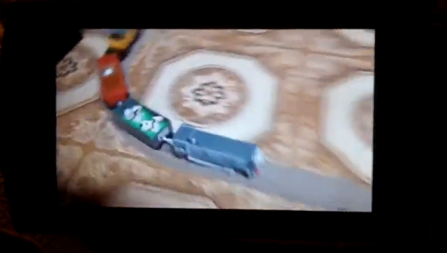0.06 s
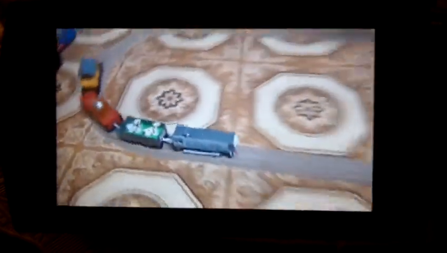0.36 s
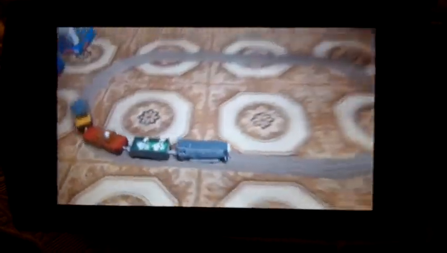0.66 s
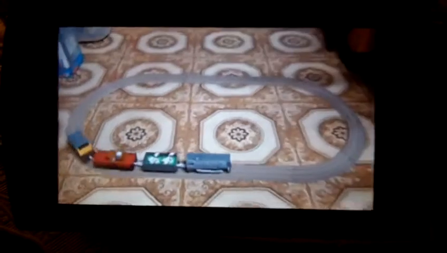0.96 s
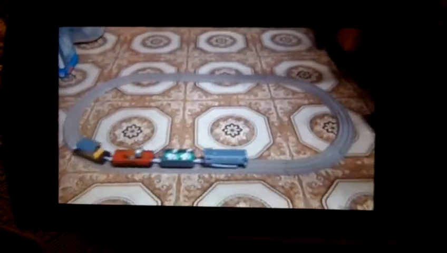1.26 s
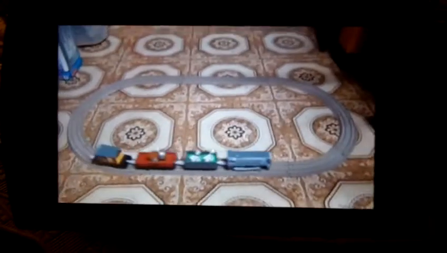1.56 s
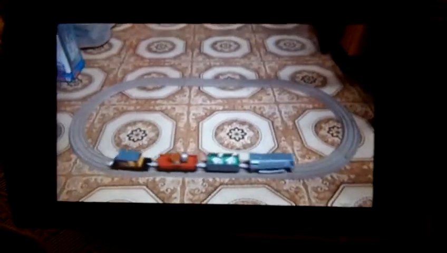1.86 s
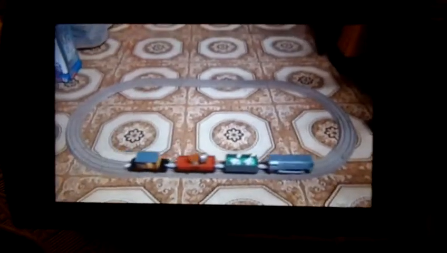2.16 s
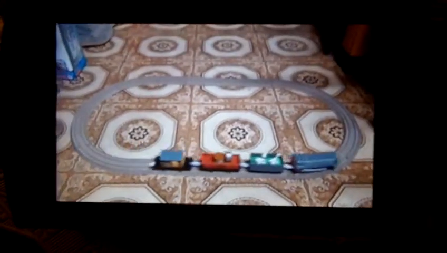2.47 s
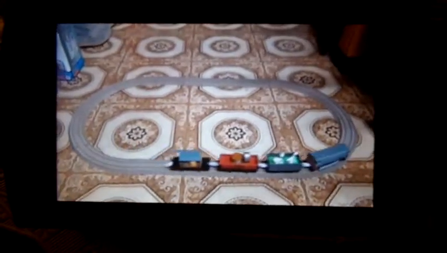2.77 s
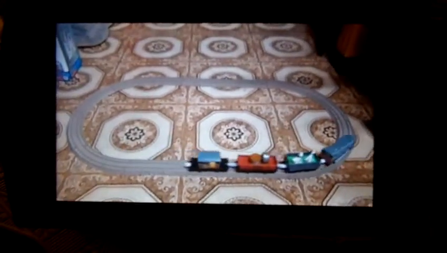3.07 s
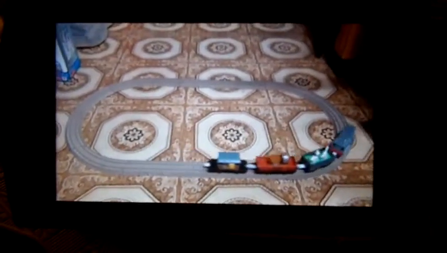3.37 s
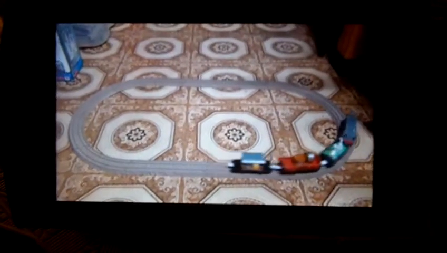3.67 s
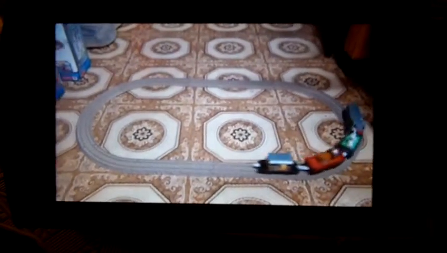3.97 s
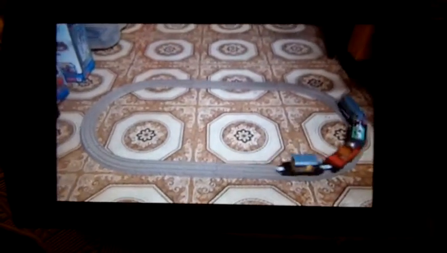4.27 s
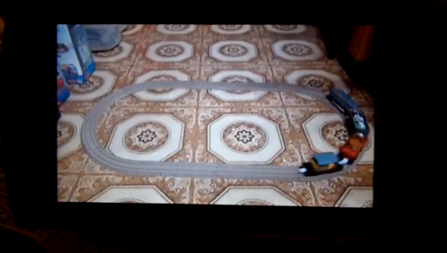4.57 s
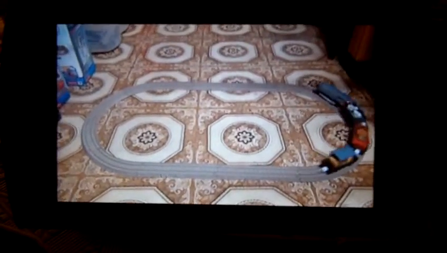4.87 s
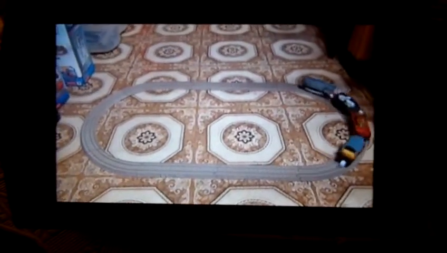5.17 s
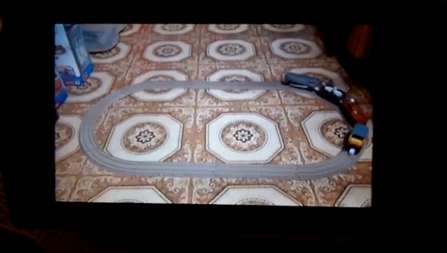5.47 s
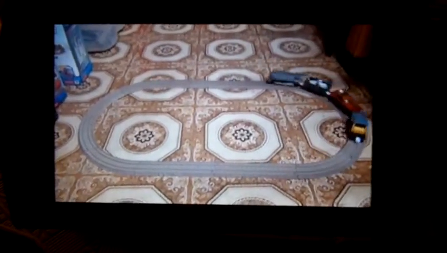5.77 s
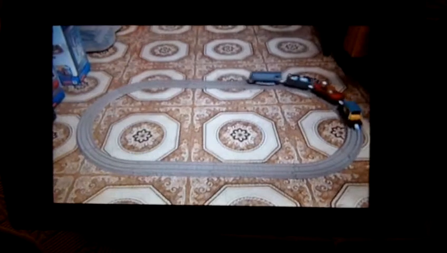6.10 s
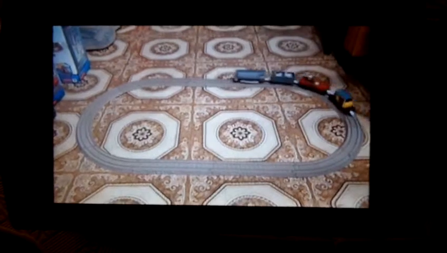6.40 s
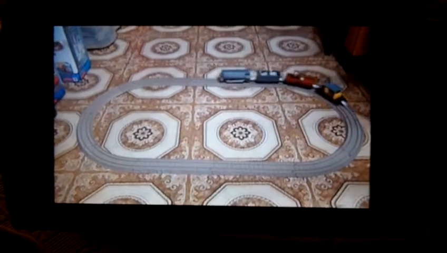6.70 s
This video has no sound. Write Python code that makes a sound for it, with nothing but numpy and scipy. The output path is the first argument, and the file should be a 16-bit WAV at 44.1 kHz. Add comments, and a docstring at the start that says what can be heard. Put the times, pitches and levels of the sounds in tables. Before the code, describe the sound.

Thin motor whir, chattering plastic gears and clicking wagons as a toy train circles its hollow track indoors, close by and then slightly farther away.

```python
"""A battery toy train circles a plastic track on a tiled floor, close by, then off round the far bend.
Its motor ticks once a turn, and loose gear teeth chatter, snap and whine in the plastic shell.
The wheels drum on the hollow track and squeak in the bends; the wagons clack along behind.
The room is small, with a low rumble, and the microphone takes one soft cluster of bumps.
The sound is thin and nearly mono, with narrow notches in the treble."""
import sys
import numpy as np
from scipy import signal
from scipy.fft import rfft, irfft
from scipy.io import wavfile
from scipy.ndimage import uniform_filter1d

SR = 44100
rng = np.random.default_rng(int(sys.argv[2]) if len(sys.argv) > 2 else 0)


def bounce(signal):
    """Save signal as a 16-bit WAV file at the path given by the first command-line argument."""
    frames = np.transpose(np.atleast_2d(signal))
    limited = np.clip(frames, -1, 1)
    pcm = np.round(limited * 32767).astype(np.int16)
    wavfile.write(sys.argv[1], SR, pcm)


N = 297234
T = np.arange(N) / SR

# room rumble common to both channels: freq_hz, level_db
RUMBLE_SPECTRUM = [(3, -2), (18, 1), (30, -6.5), (45, -9.5), (62, -11.5), (80, -15), (120, -20), (200, -23),
                   (450, -27.5), (1000, -55.5), (4000, -59)]
# room rumble that differs between left and right: freq_hz, level_db
RUMBLE_SIDE_SPECTRUM = [(3, 0), (30, -3), (50, -6), (90, -13), (170, -35), (550, -35), (900, -58)]
# a brief low rush in the background: freq_hz, level_db
RUSH_SPECTRUM = [(250, -18), (385, -1), (520, -10)]
# soft bumps right on the microphone: start_s, level_db, pitch_hz, decay_s
MIC_BUMPS = [(1.751, -43, 320, 0.0028), (1.769, -31.5, 556, 0.002), (1.788, -47, 400, 0.0023),
             (1.8, -47, 80, 0.01), (1.804, -41, 296, 0.0025), (1.809, -37, 28.2, 0.012),
             (1.829, -44, 590, 0.0052)]
# narrow dips in the recorder's response: freq_hz, width_hz
RECORDER_NOTCHES = [(4770, 77), (5450, 770), (6010, 350), (6650, 130), (13900, 450)]
# the recorder's constant offset, left row then right: offset_full_scale
RECORDER_OFFSET = [
    [-.0162],
    [.0067],
]

# how the hollow track rings: freq_hz, level_db
TRACK_SPECTRUM = [(450, -32.5), (600, -22.5), (700, -10), (830, 0), (885, -3), (945, 1), (990, -2.5),
                  (1040, 1.5), (1150, -5), (1400, -8), (1800, -24)]
# how the train's plastic shell rings: freq_hz, level_db
SHELL_SPECTRUM = [(900, -25.5), (1400, -12.5), (1620, -9), (1880, -4), (2150, -1), (2430, -1.5),
                  (2600, -2.5), (2850, -5.5), (3150, -6.5), (3430, -4), (3650, -14), (3950, -8.5),
                  (4200, -16.5), (4450, -15.5), (4700, -28.5), (6500, -21.5)]
# how the gear teeth ring: freq_hz, level_db
TEETH_SPECTRUM = [(4500, -30.5), (5800, -16), (6500, -16.5), (7200, -3), (7750, 1), (8100, -1), (8600, -10),
                  (9200, -8), (9900, -16), (10400, -26), (10900, -21), (11800, -28), (12600, -21),
                  (13700, -26), (14400, -30), (15000, -33)]
# resonances that rise or fall along the loop: centre_s, half_length_s, freq_hz, width_hz, gain_db
RESONANCE_SWELLS = [(0.1, 1, 825, 170, -4.5), (0.6, 0.39, 1120, 220, 3), (1.046, 0.94, 1950, 260, 4),
                    (1.15, 0.93, 2380, 420, 4), (1.25, 0.45, 3130, 260, -5), (2.6, 0.55, 920, 480, 2.2),
                    (2.558, 0.56, 4330, 300, 5), (3.4, 0.74, 1430, 200, -2), (4.905, 1, 2830, 350, -1.5)]
# the train's balance, close by and then in the far bend: time_s, whir_db, track_db, sizzle_db
PASS_LEVELS = [(0, -42, -47.5, -50.5), (.25, -42.5, -49, -49), (.7, -45, -51, -48),
               (1.5, -43.5, -47, -47.5), (1.95, -44, -48.5, -46.5), (2.3, -42.5, -46.5, -47),
               (2.6, -43.5, -48, -49.5), (2.92, -44, -46, -52), (3.15, -45, -48, -53),
               (3.75, -45.5, -47.5, -56), (4.45, -46, -53.5, -56), (5.4, -46, -55, -56),
               (6.1, -45, -51.5, -55), (6.74, -44, -50, -53)]

# wheel flanges rubbing the rail: centre_s, half_length_s, pitch_hz, level_db
FLANGE_SQUEAKS = [(0.167, 0.008, 2140, -39), (0.24, 0.0088, 3130, -38), (0.266, 0.018, 3310, -44),
                  (0.31, 0.013, 2360, -39), (0.388, 0.068, 2120, -43.5), (0.66, 0.089, 2330, -44),
                  (4.203, 0.012, 3250, -44.5), (5.193, 0.05, 2400, -54), (5.64, 0.062, 2121, -51.5),
                  (6.04, 0.1, 1955, -52), (6.73, 0.02, 2000, -45)]
# the loudest knocks of wheels and couplings: start_s, peak_db, brightness_db
WAGON_CLACKS = [(0.0212, -39, -12), (0.0654, -32, 5), (0.1548, -24.5, -7), (0.234, -28.5, 2),
                (0.2898, -25, 1), (0.4538, -31.5, -9), (0.5352, -26, -4), (0.589, -28.5, -20),
                (0.6452, -36, -7), (0.772, -28, -14), (0.8019, -28, -14), (0.835, -35, -12),
                (0.864, -32, -6), (0.886, -30, -12), (0.928, -27.5, -9), (0.999, -32, -12),
                (1.09, -32, -12), (1.1194, -27.5, -13), (1.1791, -25.5, -14), (1.2117, -31, -7),
                (1.4373, -27, -12), (1.469, -29, -9), (1.5013, -33, -13), (1.522, -31, -15),
                (1.5908, -23, -10), (1.6439, -35, -1), (1.708, -26.5, -6), (1.7958, -27.5, -7),
                (2.0926, -25, 3), (2.098, -26, -2), (2.164, -28, -7), (2.914, -32, -5), (4.027, -34, -7),
                (4.1977, -36, -8), (4.437, -29, -8), (5.2671, -34, -18), (5.3835, -31.5, -18),
                (5.5101, -37, -15), (5.59, -38, -7), (5.666, -34, -4), (5.728, -40, -10),
                (5.7886, -38, -11), (6.0656, -28, -22), (6.3937, -32, -11), (6.464, -38, -12),
                (6.6812, -28.5, -16)]
# gear teeth skipping: start_s, peak_db
TOOTH_SNAPS = [(1.136, -30), (2.001, -30), (2.229, -29), (2.2713, -32), (2.294, -31), (2.3152, -33),
               (2.3416, -38), (2.3635, -27.5), (2.4065, -35), (2.4287, -28.5), (2.4947, -29), (2.5407, -33),
               (2.563, -30), (2.608, -30), (2.6753, -33), (2.8519, -34), (3.099, -36), (3.2187, -35),
               (3.225, -33), (3.2878, -34), (3.56, -39), (3.728, -33.5), (3.8089, -41), (3.8874, -43),
               (3.902, -44), (3.965, -36), (4.0144, -39), (4.086, -35.5), (4.15, -38), (4.1712, -36),
               (4.1975, -33), (4.236, -37), (4.3457, -39), (4.4959, -32), (4.5467, -35), (4.7286, -36),
               (4.8351, -39), (4.846, -34), (5.314, -43), (5.3833, -36), (5.51, -39), (6.5291, -34)]
# the whine of the two gear meshes: time_s, lower_mesh_db, upper_mesh_db
WHINE_LEVELS = [(0, -71, -66), (3.9, -61, -68), (4.5, -69, -52.5), (5, -59, -56), (5.3, -55.5, -50),
                (5.55, -52.5, -66), (5.85, -57, -56), (6.03, -52, -55), (6.3, -59, -59), (6.55, -55, -62),
                (6.74, -53, -57)]
# moments when the gears run slack: centre_s, half_length_s, gain_db
GEAR_SLACKS = [(0.148, 0.0083, -1.5), (0.497, 0.023, -2.5), (1.085, 0.035, -2.5), (1.563, 0.02, -3),
               (1.694, 0.0081, -5), (2.055, 0.022, -1.5), (2.736, 0.034, -3), (3.042, 0.069, -3),
               (3.636, 0.037, -2.5), (4.053, 0.015, -3), (4.63, 0.06, -2.5)]
# the off-centre reduction gear catches and throbs once a turn: time_s, catch_db, throb_depth_db
REDUCTION_GEAR = [(0, -11, 1), (1.9, -13, .5), (2.4, -7, 0), (3, -8, -0.1), (4.3, -12, .5),
                  (4.95, -14, -0.3), (5.35, -22, 2.5), (5.9, -17, -0.5), (6.74, -22, 1)]
# how hard the gears bite, heard in the motor's tick: time_s, tick_gain_db
GEAR_BITE = [(0, -4.5), (.8, 2.5), (1.7, -0.5), (2.4, -4), (3.2, -8), (4.4, -5), (5.6, -12), (6.74, -10)]
# the motor's speed: time_s, turns_per_s
MOTOR_SPEED = [(0, 102.8), (.35, 103.9), (.7, 104.9), (1.1, 103.7), (1.7, 105.3), (2.5, 104.1),
               (3.8, 106.6), (4.6, 111.2), (5.4, 110.2), (6.74, 110.3)]

GEAR_RATIO, WHEEL_RATIO = 7, 34.65  # motor turns per turn of the reduction gear, of the wheels
WHINE_TEETH = 18, 22  # teeth meshing per motor turn


def undb(db):
    """Decibels to gain."""
    return 10 ** (np.asarray(db) / 20)


def unit(x):
    """Scale to rms 1."""
    return x / np.sqrt(np.mean(x ** 2))


def curves(table):
    """Each column of a table, joined by straight lines in time."""
    times, *columns = np.transpose(table)
    return [np.interp(T, times, column) for column in columns]


def bell(centre_s, half_length_s):
    """A smooth rise and fall, down to 1/e a half length either side of its centre."""
    return np.exp(-((T - centre_s) / half_length_s) ** 2)


def walk(rate_hz):
    """Random levels drawn at the given rate and smoothed twice, at rms 1."""
    hold = int(SR / rate_hz)
    steps = rng.standard_normal(N)[np.arange(N) // hold]
    return unit(uniform_filter1d(uniform_filter1d(steps, hold), hold))


def ring(spectrum, size=4096):
    """Causal impulse response with the given spectrum and unit energy."""
    hz, db = np.transpose(spectrum)
    log_hz = np.log(np.maximum(np.fft.rfftfreq(size, 1 / SR), 1))
    beyond = np.abs(log_hz - np.clip(log_hz, np.log(hz[0]), np.log(hz[-1])))
    level_db = np.interp(log_hz, np.log(hz), db) - 40 * np.minimum(beyond, 1)
    cepstrum = irfft(np.log(undb(level_db)))
    cepstrum[1:size // 2] *= 2  # fold to minimum phase
    cepstrum[size // 2 + 1:] = 0
    response = irfft(np.exp(rfft(cepstrum)))
    return response / np.linalg.norm(response)


def through(x, response):
    """Pass a sound through an impulse response."""
    return signal.oaconvolve(x, response)[:len(x)]


def tail(t60_s, cloud_db, size=16384):
    """A click followed by a dense, dying cloud of reflections."""
    cloud = rng.standard_normal(size) * np.exp(-np.log(1000) * np.arange(size) / SR / t60_s)
    cloud *= undb(cloud_db) / np.linalg.norm(cloud)
    cloud[0] = 1
    return cloud


def blows(cycles, scatter_db, slop=.3):
    """One blow per cycle; play in the parts scatters its size and its moment (slop, in cycles)."""
    timing, force = rng.standard_normal((int(cycles[-1]), 2)).T
    at = np.searchsorted(cycles, np.arange(len(timing)) + slop * timing)
    return np.bincount(at, undb(scatter_db * np.minimum(force, 1)), N + 1)[:N]


def rattle(hits, t60_s, ring_db, spots=12):
    """Each blow lands on one of several spots of the plastic, each with its own short ring."""
    spot = rng.integers(0, spots, N)
    return unit(sum(through(hits * (spot == k), tail(t60_s, ring_db, size=2048)) for k in range(spots)))


def bounces(count=4, gap_s=.0028, step_db=-5.5):
    """A loose part strikes once, then a few times more, ever weaker and at uneven gaps."""
    gaps = gap_s * rng.uniform(.5, 1.5, count)
    at = ((np.cumsum(gaps) - gaps[0]) * SR).astype(int)
    return np.bincount(at, undb(step_db * np.arange(count)))


def add_knock(out, start_s, peak_db, knock):
    """Mix in one knock at the given moment and peak level."""
    at = int(start_s * SR)
    out[at:at + len(knock)] += knock[:N - at] * undb(peak_db) / np.abs(knock).max()


def room_tone():
    """Low rumble, a little stronger on the left, a faint wavering hum, a brief low rush and hiss."""
    mid = unit(through(rng.standard_normal(N), ring(RUMBLE_SPECTRUM, size=16384)))
    side = unit(through(rng.standard_normal(N), ring(RUMBLE_SIDE_SPECTRUM, size=16384)))
    rumble = undb(-57) * mid + (undb(-66) * side + undb(-79) * mid) * np.array([[1], [-1]])
    hum_hz = 241 + 3 * walk(14)
    hum = np.sin(2 * np.pi * np.cumsum(hum_hz) / SR)
    rush = unit(through(rng.standard_normal(N), ring(RUSH_SPECTRUM))) * bell(4.78, 0.34)
    hiss = rng.standard_normal(N)
    return rumble + undb(-77) * hum + undb(-71) * rush + undb(-73.5) * hiss


def mic_bumps():
    """Dull, quickly damped knocks on the microphone itself."""
    out = np.zeros(N)
    for start_s, level_db, pitch_hz, decay_s in MIC_BUMPS:
        age = np.maximum(T - start_s, 0)
        out += undb(level_db) * np.sin(2 * np.pi * pitch_hz * age) * np.exp(-age / decay_s)
    return out


def tiled_room(x, places=14):
    """Each place on the track sends its own floor reflections and room echo to the microphone."""
    position = np.linspace(0, places - 1, N)
    out = 0
    for place in range(places):
        floor = tail(t60_s=.03, cloud_db=-16, size=2048)
        echoes = through(tail(t60_s=0.18, cloud_db=-10), floor)
        crossfade = np.maximum(1 - np.abs(position - place), 0)
        out = out + through(x * crossfade, echoes)
    return out


def resonance_swells(x):
    """Single resonances of shell and track come forward or fall back along stretches of the loop."""
    out = x
    for centre_s, half_length_s, hz, width_hz, gain_db in RESONANCE_SWELLS:
        resonance = signal.lfilter(*signal.iirpeak(hz, hz / width_hz, fs=SR), x)
        out = out + (undb(gain_db) - 1) * bell(centre_s, half_length_s) * resonance
    return out


def flange_squeaks(slips_per_s=420, width_hz=155):
    """A flange sticks and slips on the rail, and one narrow resonance of the wheel sings briefly."""
    slips = blows(slips_per_s * T, scatter_db=4)
    out = np.zeros(N)
    for centre_s, half_length_s, pitch_hz, level_db in FLANGE_SQUEAKS:
        wheel = signal.iirpeak(pitch_hz, pitch_hz / width_hz, fs=SR)
        song = unit(signal.lfilter(*wheel, signal.lfilter(*wheel, slips)))
        out += undb(level_db) * bell(centre_s, half_length_s) * song
    return out


def wagon_jiggle(knocks_per_s=45):
    """The light wagons jiggle on the rails: small knocks at random moments."""
    hits = (rng.random(N) < knocks_per_s / SR) * rng.uniform(0.25, 1, N)
    body = ring(SHELL_SPECTRUM) + undb(-9.5) * ring(TRACK_SPECTRUM) + undb(-6.5) * ring(TEETH_SPECTRUM)
    return unit(through(rattle(hits, t60_s=0.027, ring_db=5), body))


def wagon_clacks():
    """Wheels and couplings knock and bounce, ringing briefly in shell, track and teeth."""
    out = np.zeros(N)
    body = ring(SHELL_SPECTRUM) + undb(-8) * ring(TRACK_SPECTRUM)
    bright = ring(TEETH_SPECTRUM)
    for start_s, peak_db, brightness_db in WAGON_CLACKS:
        blow = through(tail(t60_s=0.019, cloud_db=1.5), bounces())
        add_knock(out, start_s, peak_db, through(blow, body + undb(brightness_db) * bright))
    return out


def reduction_turns(turns, skip_s=2.229):
    """Turns of the reduction gear, aligned so that its catching tooth comes round at skip_s."""
    gear = turns / GEAR_RATIO
    return gear + (-np.interp(skip_s, T, gear)) % 1


def gear_throb(turns):
    """Gain that rises and falls once a turn of the off-centre reduction gear."""
    _, depth_db = curves(REDUCTION_GEAR)
    return undb(depth_db * np.cos(2 * np.pi * (reduction_turns(turns) - .5)))


def drive_load(turns, wobble_db=0.32, heaviest_turn=.63):
    """Gain from the load: it sways with the out-of-true wheels and drops while the gears run slack."""
    sway_db = wobble_db * np.cos(2 * np.pi * (turns / WHEEL_RATIO - heaviest_turn))
    slack_db = sum(db * bell(centre_s, half_length_s) for centre_s, half_length_s, db in GEAR_SLACKS)
    return undb(sway_db + slack_db)


def wheel_drumming(turns):
    """The ribbed driving wheels drum on the hollow track, pulsing twice a turn of the reduction gear."""
    pulsing = undb(1.6 * np.cos(4 * np.pi * reduction_turns(turns)))
    ribs = blows(turns * 5, scatter_db=3.5) * pulsing
    return unit(through(rattle(ribs, t60_s=0.029, ring_db=-1), ring(TRACK_SPECTRUM)))


def tooth_snaps(top_hz=10100):
    """A skipping tooth cracks in a tight cluster of ticks; a little of it reaches the shell."""
    out = np.zeros(N)
    crack = signal.sosfilt(signal.butter(2, top_hz, fs=SR, output="sos"), ring(TEETH_SPECTRUM))
    tooth = crack + undb(-5.5) * ring(SHELL_SPECTRUM)
    for start_s, peak_db in TOOTH_SNAPS:
        cluster = through(tail(t60_s=0.016, cloud_db=5), bounces())
        add_knock(out, start_s, peak_db, through(cluster, tooth))
    return out


def gear_whine(motor_hz, turns, waver=0.00498):
    """Two gear meshes sing at multiples of the motor's speed, taking turns in the far bend."""
    tones = 0
    for teeth, level_db in zip(WHINE_TEETH, curves(WHINE_LEVELS)):
        hz = teeth * motor_hz * (1 + waver * walk(70))
        flutter = undb(4.2 * walk(90))
        tones = tones + undb(level_db) * unit(np.sin(2 * np.pi * np.cumsum(hz) / SR) * flutter)
    return tones * gear_throb(turns)


def motor_rub(turns, pitch_hz=8200, width_hz=1500, sharpness=2.8):
    """The bright part of the motor's tick: a short rub each turn sings in a small part of the gearbox."""
    once_a_turn = np.exp(sharpness * np.cos(2 * np.pi * turns))
    friction = rng.standard_normal(N) * once_a_turn * undb(1.2 * walk(90))
    resonance = signal.iirpeak(pitch_hz, pitch_hz / width_hz, fs=SR)
    return unit(signal.lfilter(*resonance, through(friction, ring(TEETH_SPECTRUM))))


def gearbox(turns):
    """Teeth chatter, the motor ticks and the slower gear catches; gives shell whir and tooth sizzle."""
    tick_db, = curves(GEAR_BITE)
    catch_db, _ = curves(REDUCTION_GEAR)
    gear = reduction_turns(turns)
    tooth_load = undb(1.2 * walk(110)) * gear_throb(turns)
    chatter = unit(blows(turns * 7, scatter_db=4) * tooth_load)
    scraping = unit(blows(turns * 9, scatter_db=6) * tooth_load * undb(walk(110) + walk(30)))
    ticks = unit(blows(turns, scatter_db=2, slop=.03))
    main_catches = blows(gear, scatter_db=5.5, slop=0.042)
    light_catches = undb(-4) * blows(3 * gear, scatter_db=7, slop=0.043)
    catches = undb(catch_db) * unit(main_catches + light_catches)
    shell_hits = chatter + undb(tick_db - 7.5) * ticks + undb(-6.5) * catches
    whir = unit(through(rattle(shell_hits, t60_s=0.024, ring_db=-1.5), ring(SHELL_SPECTRUM)))
    rub = motor_rub(turns)
    tooth_hits = scraping + undb(2) * catches
    teeth = unit(through(rattle(tooth_hits, t60_s=0.015, ring_db=6), ring(TEETH_SPECTRUM)))
    bite = undb(tick_db - 1)
    sizzle = (teeth + bite * rub) / np.sqrt(1 + bite ** 2)  # constant-power blend
    return whir, sizzle


def scene():
    """The train as heard from one spot in a small room with a tiled floor."""
    motor_hz, = curves(MOTOR_SPEED)
    whir_db, track_db, sizzle_db = curves(PASS_LEVELS)
    turns = np.cumsum(motor_hz) / SR
    whir, sizzle = gearbox(turns)
    load = drive_load(turns)
    shell = whir + undb(-11.5) * wagon_jiggle()
    running = undb(whir_db) * shell + undb(track_db) * wheel_drumming(turns) + undb(sizzle_db) * sizzle
    train = load * running + wagon_clacks() + tooth_snaps()
    in_room = tiled_room(resonance_swells(train))
    return in_room + load * gear_whine(motor_hz, turns) + flange_squeaks() + mic_bumps() + room_tone()


def record(dry, top_hz=15150):
    """The recorder notches the treble, drops the top and adds a small constant offset to each channel."""
    for hz, width_hz in RECORDER_NOTCHES:
        dry = signal.lfilter(*signal.iirnotch(hz, hz / width_hz, fs=SR), dry)
    lowpass = signal.ellip(10, .2, 70, top_hz, fs=SR, output="sos")
    return signal.sosfilt(lowpass, dry) + RECORDER_OFFSET


dry = scene()
out = record(dry)
bounce(out)
```